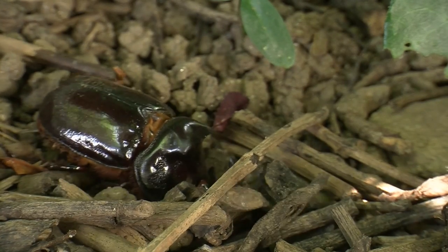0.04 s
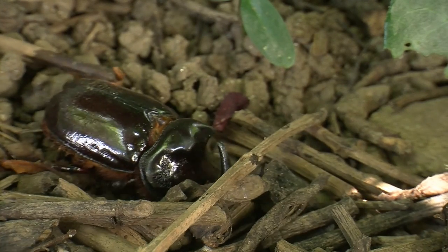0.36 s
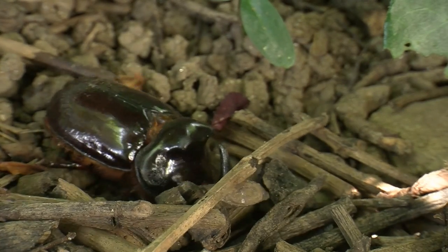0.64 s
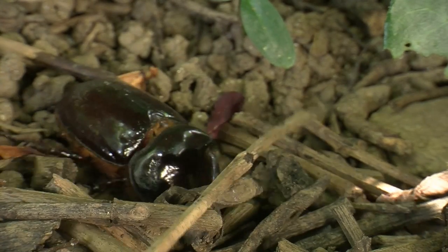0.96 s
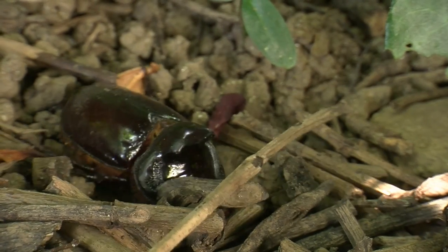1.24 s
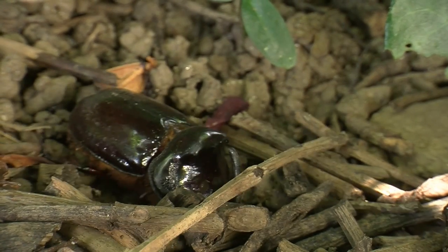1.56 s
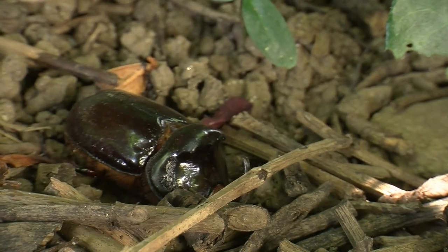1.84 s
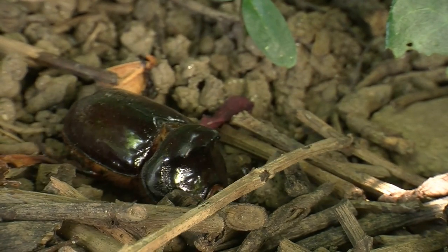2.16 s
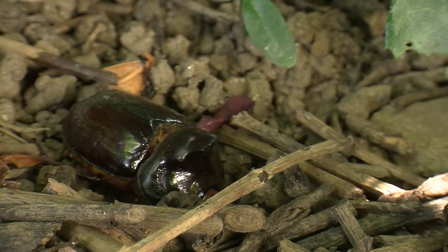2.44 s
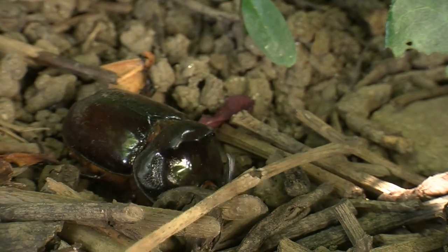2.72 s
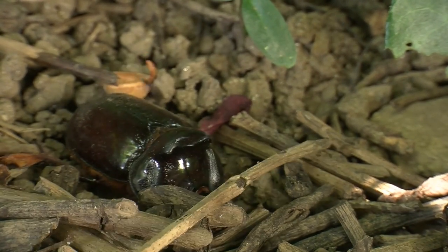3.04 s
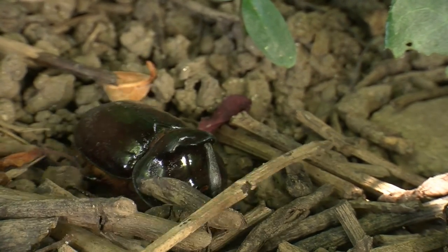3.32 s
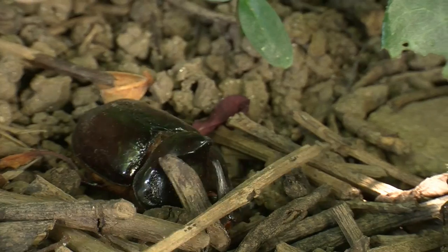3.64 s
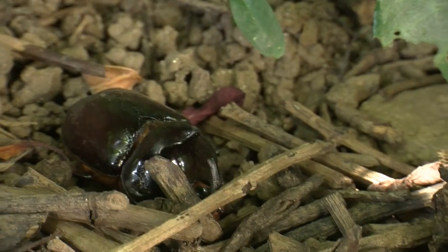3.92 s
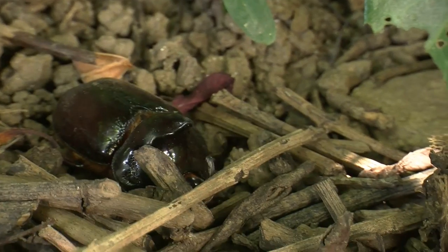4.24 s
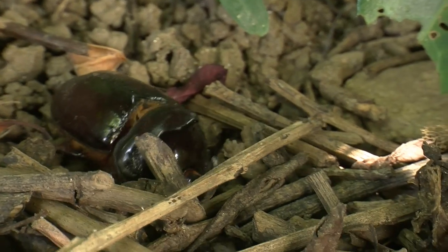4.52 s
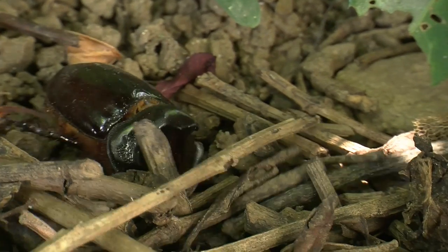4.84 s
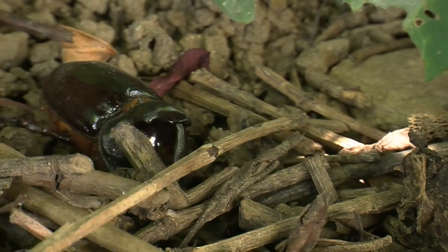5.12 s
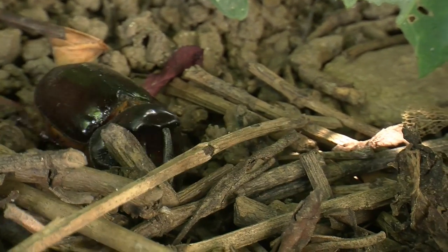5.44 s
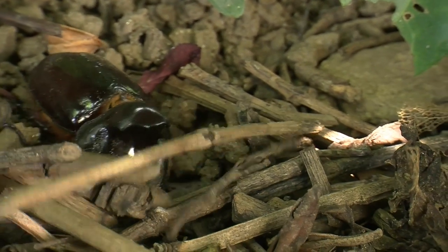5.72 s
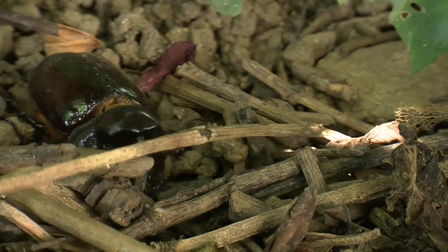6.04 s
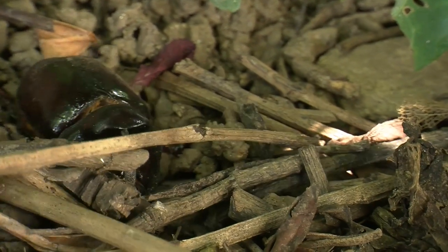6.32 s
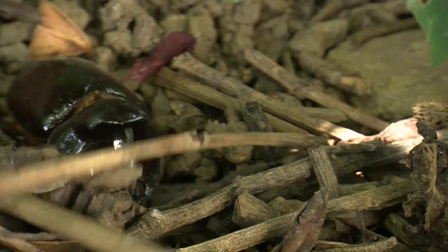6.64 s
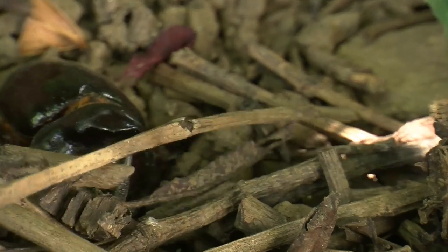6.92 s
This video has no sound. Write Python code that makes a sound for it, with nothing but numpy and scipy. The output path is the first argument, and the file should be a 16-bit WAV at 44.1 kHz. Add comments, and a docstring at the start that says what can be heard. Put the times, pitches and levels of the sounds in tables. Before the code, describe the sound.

Close to the microphone, a beetle pushes through dry twigs and soil with faint scrapes, ticks and tiny snaps. Low, dull thuds from the nudged camera mount stand out in the first two seconds and come back louder around five seconds. Small birds chirp faintly far off in the woods, busiest just past the middle. Soft hiss and a distant rumble lie underneath, the rumble swelling twice.

```python
"""Beetle on a woodland floor

Close to the microphone, a large beetle shoves through dry twigs and soil: faint scrapes, tiny snaps.
The camera is nudged as it follows, and its mount thuds and sways at a few low resonances.
Small birds call far off among the trees, over the microphone's hiss and a distant rumble
that swells twice."""
import sys
import numpy as np
from scipy import signal
from scipy.fft import rfft, irfft, next_fast_len
from scipy.io import wavfile

SR = 44100
rng = np.random.default_rng(int(sys.argv[2]) if len(sys.argv) > 2 else 0)


def digitize_waveform(pressure):
    """Quantize a signal to 16-bit integers and store it at the path in sys.argv[1].

    Rows of a 2-D input are taken as channels; values are limited to [-1, 1].
    """
    field = np.atleast_2d(pressure).T
    bounded = np.clip(field, -1, 1)
    quanta = np.round(bounded * 32767).astype(np.int16)
    wavfile.write(sys.argv[1], SR, quanta)


N = 316197
TIME = np.arange(N) / SR

# spectrum of still air and microphone hiss: f/Hz, relative density/dB
AIR_SPECTRUM = [(12, -44), (20, -4.5), (44, -0.5), (64, -11), (103, -4), (126, 1.5), (157, -2), (175, -6),
                (282, -6.5), (324, -9), (427, -14), (534, -16), (834, -20), (1410, -25.5), (15500, -35)]
# resonances of the far drone: f/Hz, width/Hz, relative level/dB
DRONE_BANDS = [(140, 68, 2), (254.3, 124, 7)]
# contour of the drone and the still air together: t/s, relative level/dB
DRONE_CONTOUR = [(0.0, -63.5), (2.25, -58.5), (2.7, -61.5), (2.93, -57), (3.75, -57.5), (4.95, -53),
                 (5.21, -53), (5.55, -58), (6.11, -63.5), (7.17, -60.5)]
# spectrum of the broad, distant rush: f/Hz, relative density/dB
RUSH_SPECTRUM = [(250, -15.5), (450, -1), (900, 0), (1200, -4), (1700, -7.5), (2400, -17), (5000, -29.5)]
# swells of the rush: peak t/s, half-width/s, level/dB
RUSH_SWELLS = [(4.55, 0.67, -64.5), (6.95, .4, -69)]
# faint whines within the rumble: start t/s, end t/s, f/Hz, level/dB
FAR_WHINES = [(4.45, 4.797, 951, -71), (6.038, 7.17, 427.6, -70)]

# one bird's thin, rising calls: t/s, length/s, first f/Hz, held f/Hz, relative level/dB
RISING_CALLS = [(2.48, .1, 5950, 6100, -83), (2.90, .09, 5850, 6150, -80), (3.368, .1, 5650, 6000, -77),
                (3.918, 0.14, 5750, 6080, -81), (4.512, .09, 4300, 5800, -78),
                (5.398, .26, 4600, 5740, -80), (6.225, .24, 4400, 5800, -78)]
# falling, trilled chirps: t/s, first f/Hz, relative level/dB
FALLING_CHIRPS = [(.106, 4700, -73.5), (.178, 3790, -70.5), (3.33, 3650, -73.5), (4.763, 4400, -69),
                  (4.815, 3100, -71), (4.967, 4700, -68), (5.01, 3300, -69.5), (5.162, 5520, -74),
                  (5.195, 4200, -68.5), (5.295, 3400, -75), (5.35, 2950, -76)]
# a soft, low whistle in two notes: t/s, f/Hz, relative level/dB
SOFT_WHISTLES = [(1.49, 2195, -78), (1.598, 2250, -73)]

# nudges of the camera mount: t/s, thud gain/dB, sway level/dB, contact/ms
MOUNT_NUDGES = [(.433, -48, -58, 2.4), (.586, -57, -52, 2.6), (.807, -45, -61, 5.2), (.902, -35, -43, 6.1),
                (.964, -46, -56, 4.4), (1.249, -30.5, -50, 3.9), (1.285, -61, -41, 4.3),
                (1.538, -45, -41.5, 5), (1.608, -45.5, -61, 3.3), (1.638, -45, -54, 3.4),
                (2.055, -38.5, -69, 4.5), (4.317, -51.5, -45.5, 2.8), (4.385, -58, -41.5, 5.5),
                (4.449, -55, -46, 5.7), (4.510, -49.5, -55, 4), (4.656, -39.5, -56, 3.8),
                (4.705, -32.5, -61, 4.9), (4.809, -36, -55, 4.9), (4.829, -32.5, -41, 1.93),
                (4.867, -30, -56, 3.8), (4.979, -31.5, -57, 2.4), (5.003, -24, -45, 4.2),
                (5.036, -34.5, -32, 3.3), (5.222, -34, -45, 0.86), (5.361, -26, -44, 3.6),
                (5.392, -28, -46.5, 4.1)]
# resonances of the mount: f/Hz, relative level/dB, t60/s
MOUNT_MODES = [(98, -5, 0.13), (133.5, 5.5, 0.15), (152.4, -4.5, 0.11), (174, -9, 0.014), (236.3, 2, 0.11),
               (262, -1, .09), (313, -34, 0.059)]

# legs and shell scraping on twigs and soil: t/s, length/s, centre f/Hz, level/dB
LEG_SCRAPES = [(0.017, .021, 4470, -67.5), (.64, .014, 6000, -75), (.755, .045, 3600, -72),
               (0.829, .025, 4500, -70), (.921, 0.016, 5000, -69), (0.931, .048, 2900, -68),
               (1.276, .03, 4000, -72), (1.321, 0.08, 2700, -71), (1.45, 0.015, 4600, -70),
               (2.035, 0.057, 1600, -63.5), (5.625, 0.021, 3200, -67.5), (5.712, .022, 5500, -68.5),
               (5.94, .015, 4500, -69), (5.975, .025, 6500, -71), (6.737, 0.047, 3960, -68),
               (6.9, .049, 3600, -69), (7.068, .039, 3200, -69)]
# claws skidding over dry bark, a thin high hiss: t/s, length/s, level/dB
CLAW_SKIDS = [(0.926, .025, -73), (1.331, .063, -68.5), (2.86, .031, -71.5), (3.118, .026, -73),
              (3.433, .02, -75), (6.755, .03, -78)]
# dry fibres snapping: t/s, centre f/Hz, width/Hz, starting level/dB
FIBRE_SNAPS = [(.022, 4500, 6000, -62), (.646, 2100, 900, -60), (0.93, 4860, 2000, -60),
               (4.935, 8400, 1000, -63), (5.115, 8400, 1000, -65), (5.849, 5300, 3200, -59),
               (5.849, 9500, 1300, -61), (7.127, 8500, 1400, -59.5), (7.133, 3100, 1000, -58)]


def undb(db):
    """Decibels to gain."""
    return 10 ** (np.asarray(db) / 20)


def unit(x):
    """Scale to rms 1."""
    return x / np.sqrt(np.mean(x ** 2) + 1e-20)


def add(track, s, sound):
    """Mix a sound into the track at time s."""
    start = max(int(s * SR), 0)
    part = sound[:max(N - start, 0)]
    track[start:start + len(part)] += part


def band(x, hz, width_hz):
    """Band-pass with fairly steep skirts, scaled to rms 1."""
    f = np.fft.rfftfreq(len(x), 1 / SR) + 1e-6
    return unit(irfft(rfft(x) / (1 + ((f - hz * hz / f) / width_hz) ** 2), len(x)))


def coloured(spectrum):
    """Noise of rms 1, shaped by rows of f/Hz, level/dB."""
    hz, db = np.transpose(spectrum)
    size = next_fast_len(N)
    f = np.fft.rfftfreq(size, 1 / SR) + 1
    gain = undb(np.interp(np.log(f), np.log(hz), db))
    return unit(irfft(rfft(rng.standard_normal(size)) * gain, size)[:N])


def wander(per_s, t=TIME):
    """Random drift with a spread near 1."""
    return np.interp(t * per_s, np.arange(512), rng.standard_normal(512))


def decay(t60_s, t):
    """Envelope that falls 60 dB in t60_s."""
    return np.exp(-np.log(1000) * t / t60_s)


def ring(hz, t60_s, t):
    """One struck mode."""
    return np.sin(2 * np.pi * hz * t) * decay(t60_s, t)


def far_drone(still_air_db=-64):
    """Low bands of noise in the distance, heard as far as they rise out of the still air."""
    hum = unit(sum(undb(db) * band(rng.standard_normal(N), hz, width) for hz, width, db in DRONE_BANDS))
    contour = undb(np.interp(TIME, *np.transpose(DRONE_CONTOUR)))
    power = np.maximum(contour ** 2 - undb(still_air_db) ** 2, 0)
    return undb(-2.5 + 1.15 * wander(per_s=8.3)) * np.sqrt(power) * hum


def far_rush(rest_db=-76.5):
    """Broad noise that swells and ebbs like something passing a long way off."""
    swells = sum(undb(db) ** 2 / (1 + ((TIME - s) / width) ** 2) for s, width, db in RUSH_SWELLS)
    power = undb(rest_db) ** 2 + swells
    return undb(1.4 * wander(per_s=9)) * np.sqrt(power) * coloured(RUSH_SPECTRUM)


def far_whines():
    """Thin, distant tones that fade in and out, unsteady in pitch and level."""
    out = np.zeros(N)
    for start, end, hz, db in FAR_WHINES:
        progress = np.clip((TIME - start) / (end - start), 0, 1)
        fade = np.sqrt(np.abs(np.sin(np.pi * progress)))
        gain = undb(db + 4.7 * wander(per_s=7.4))
        pitch_hz = hz * (1 + .0063 * wander(per_s=22))
        out += gain * fade * np.sin(2 * np.pi * np.cumsum(pitch_hz) / SR)
    return out


def background(air_db=-58.5):
    """The bed of the wood: steady air and microphone hiss, with the rumble far behind."""
    return undb(air_db) * coloured(AIR_SPECTRUM) + far_drone() + far_rush() + far_whines()


def scatter(x, t60_s):
    """Many faint reflections among the trees, dying away at unchanged power."""
    paths = rng.standard_normal(SR) * decay(t60_s, TIME[:SR])
    return signal.fftconvolve(x, paths / np.sqrt(np.sum(paths ** 2)))[:N]


def bird_note(length, first_hz, held_hz, trill_depth_hz, slide_s=.04, fade_db=0):
    """A whistle sliding towards a held pitch with a fast, uneven trill; it may fade as it goes."""
    t = TIME[:int(length * SR)]
    progress = t / length
    trill = trill_depth_hz * wander(per_s=900, t=t)
    hz = held_hz + (first_hz - held_hz) * np.exp(-t / slide_s) + trill
    envelope = np.sqrt(np.sin(np.pi * progress)) * undb(-fade_db * progress)
    return unit(envelope * np.sin(2 * np.pi * np.cumsum(hz) / SR))


def far_birds():
    """Calls, chirps and whistles, blurred by leaves and echoed by trunks on the way to the microphone."""
    calls = np.zeros(N)
    for s, length, first_hz, held_hz, db in RISING_CALLS:
        add(calls, s, undb(db) * bird_note(length, first_hz, held_hz, trill_depth_hz=125, fade_db=13))
    for s, hz, db in FALLING_CHIRPS:
        add(calls, s, undb(db) * bird_note(.051, hz, .78 * hz, trill_depth_hz=395, slide_s=.018))
    for s, hz, db in SOFT_WHISTLES:
        add(calls, s, undb(db) * bird_note(.075, hz, hz, trill_depth_hz=12))
    leaves = undb(-5) * scatter(calls, t60_s=.08)
    trunks = undb(-4) * scatter(calls, t60_s=.8)
    return undb(-10) * calls + leaves + trunks


def far_twitter(start_s=4.26, end_s=4.76, per_s=13):
    """A run of falling chips from deeper in the wood, arriving only as reflections."""
    chips = np.zeros(N)
    for s in np.arange(start_s, end_s, 1 / per_s):
        late, detune = rng.standard_normal(2)
        held_hz = 3150 * (1 + .04 * detune)
        chip = bird_note(.047, 4900, held_hz, trill_depth_hz=440, slide_s=.014)
        add(chips, s + .008 * late, undb(-73.5) * chip)
    return scatter(chips, t60_s=.72)


def hand_fidgets(start_s=3.5, end_s=5.2, per_s=4.6, thud_db=-50.5, sway_db=-58, contact_ms=2.9):
    """The hand fidgets on the mount: extra light nudges, unevenly spaced."""
    slots = np.arange(start_s, end_s, 1 / per_s)
    late = rng.random(len(slots)) / per_s
    return [(s, thud_db, sway_db, contact_ms) for s in slots + late]


def camera_mount(suspension_hz=360):
    """Each nudge rings the mount; softer contact rings fewer high modes, and the whole rig sways on."""
    out, t = np.zeros(N), TIME[:SR]
    sway = ring(hz=33.5, t60_s=.81, t=t)
    for s, thud_db, sway_db, contact_ms in MOUNT_NUDGES + hand_fidgets():
        corner_hz = 1000 / (2 * contact_ms)
        thud = np.zeros(len(t))
        for hz, db, t60_s in MOUNT_MODES:
            gain = undb(db) / np.sqrt(1 + (hz / corner_hz) ** 4)
            detune = 1 + .018 * rng.standard_normal()
            thud += gain * ring(hz * detune, t60_s, t)
        push = 1 - np.exp(-2 * corner_hz * t)  # the force builds up over the contact time
        add(out, s, push * (undb(thud_db) * thud + undb(sway_db) * sway))
    # the microphone's soft suspension lets only the bass through
    return signal.sosfiltfilt(signal.butter(4, suspension_hz, fs=SR, output="sos"), out)


def leg_stroke(length, hz, width_hz, spread_db=4.5):
    """One push of a leg: dense, unequal slips that swell and die, coloured by what it rubs."""
    t = TIME[:4096]
    strength_db = spread_db * np.repeat(rng.standard_normal(len(t) // 8), 8)  # 8 samples a slip
    slips = rng.standard_normal(len(t)) * undb(strength_db)
    swell = np.sin(np.pi * np.minimum(t / length, 1))
    return swell * band(slips, hz, width_hz)


def beetle(grit_per_s=23, grit_db=-84.5):
    """Close up in the litter: legs scrape, claws skid, fibres snap and grit ticks in between."""
    out, t = np.zeros(N), TIME[:4096]
    for s, length, hz, db in LEG_SCRAPES:
        add(out, s, undb(db) * leg_stroke(length, hz, width_hz=1.7 * hz))
    for s, length, db in CLAW_SKIDS:
        add(out, s, undb(db) * leg_stroke(length, hz=8300, width_hz=2000))
    for s, hz, width_hz, db in FIBRE_SNAPS:
        fibre = band(rng.standard_normal(len(t)), hz, width_hz)
        add(out, s, undb(db) * fibre * decay(t60_s=.019, t=t))
    grit = (rng.random(N) < grit_per_s / SR) * rng.standard_normal(N)
    return out + undb(grit_db) * band(grit, hz=5000, width_hz=15000)


def scene():
    """The wood from far to near, at one microphone close to the beetle."""
    return (background() + far_birds() + far_twitter() + camera_mount() + beetle())[None]


def record(dry):
    """The recorder cuts the top steeply."""
    top_hz = 15720
    return signal.sosfilt(signal.ellip(12, .1, 70, top_hz, fs=SR, output="sos"), dry)


dry = scene()
out = record(dry)
digitize_waveform(out)
```